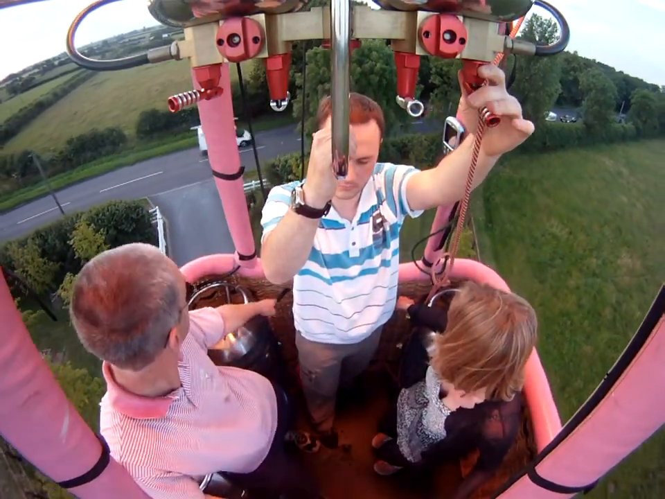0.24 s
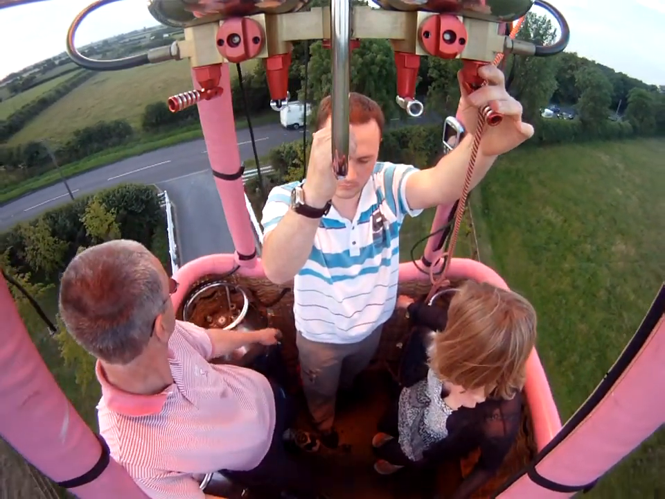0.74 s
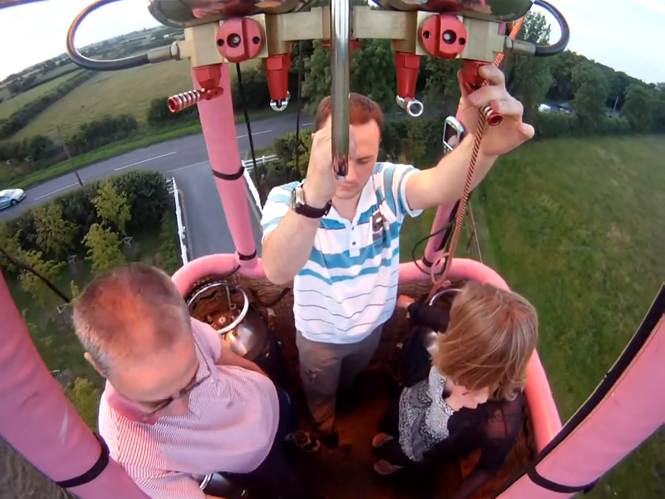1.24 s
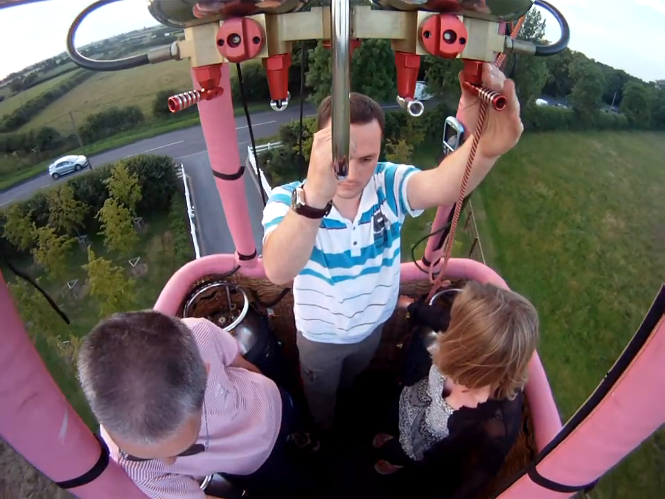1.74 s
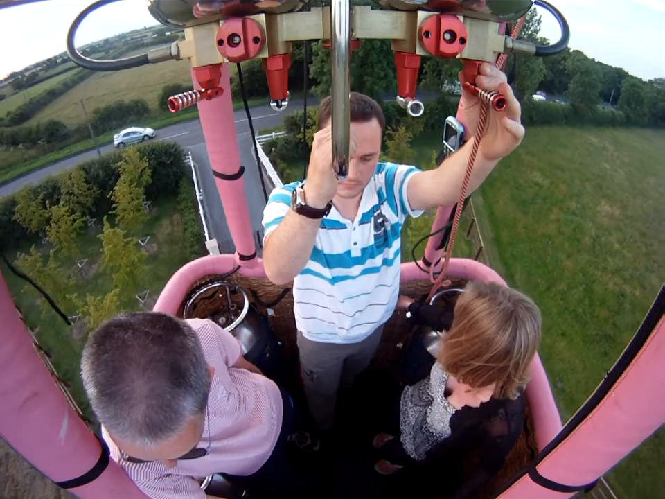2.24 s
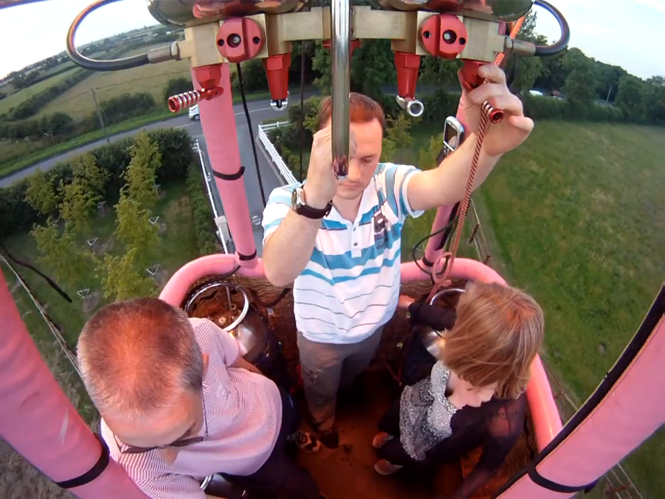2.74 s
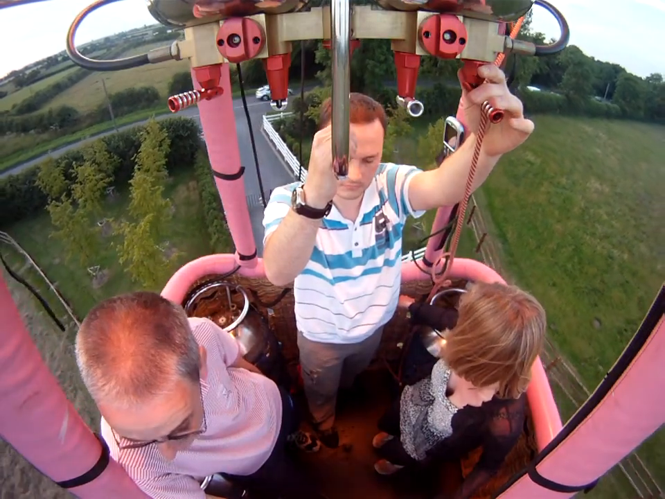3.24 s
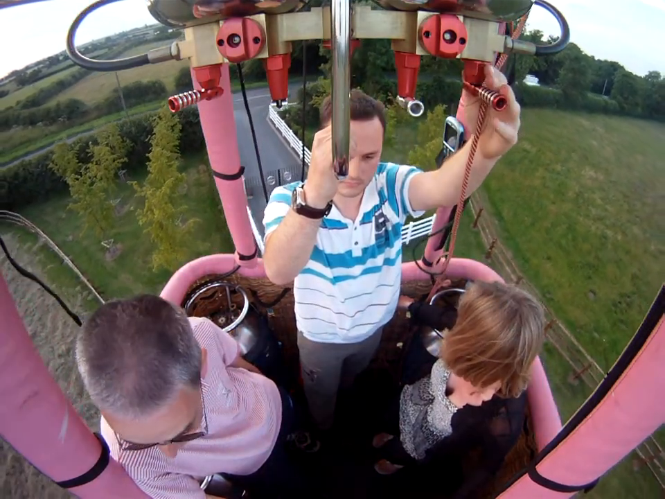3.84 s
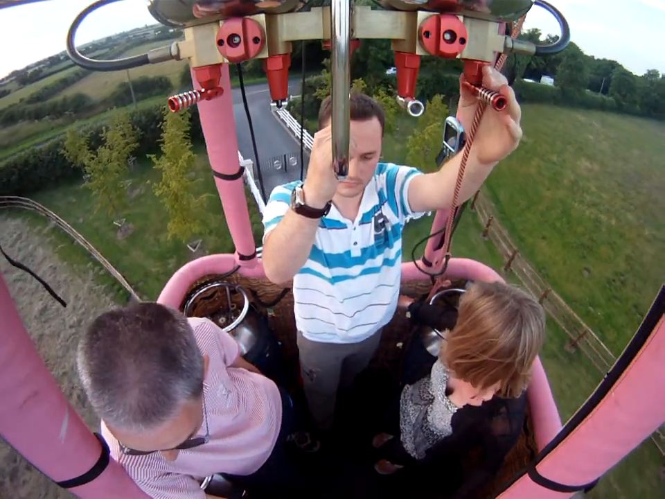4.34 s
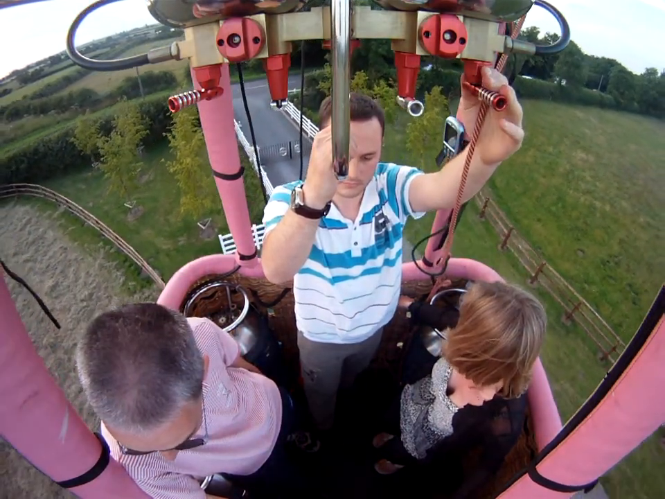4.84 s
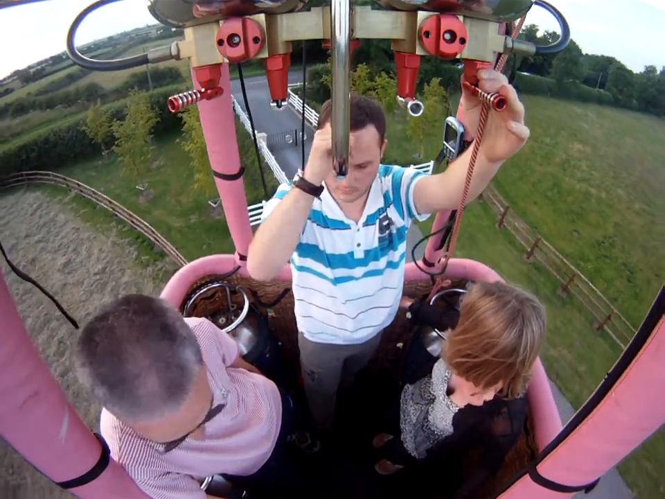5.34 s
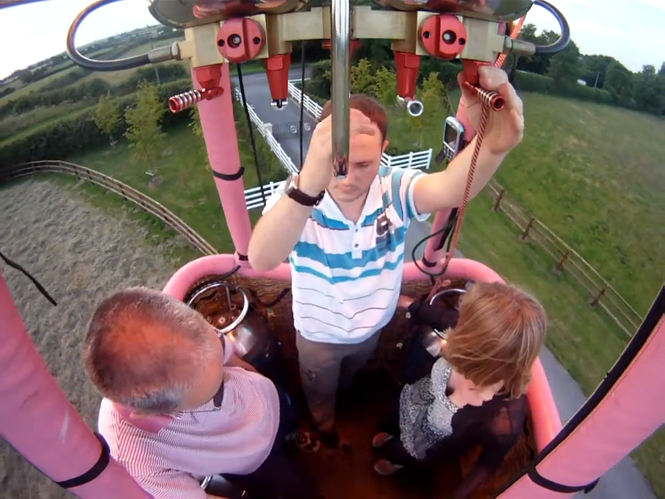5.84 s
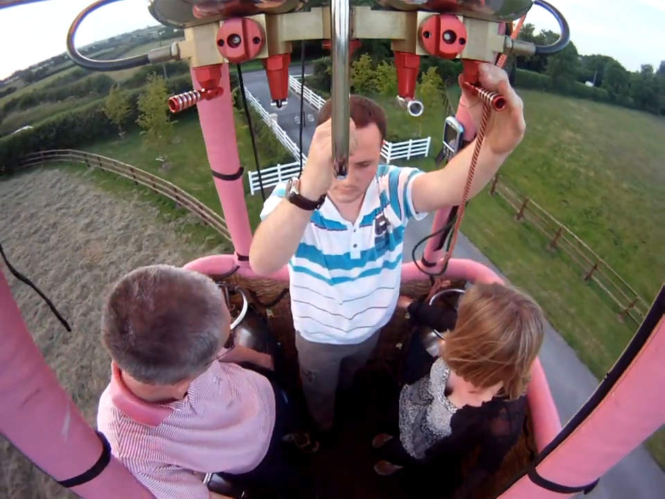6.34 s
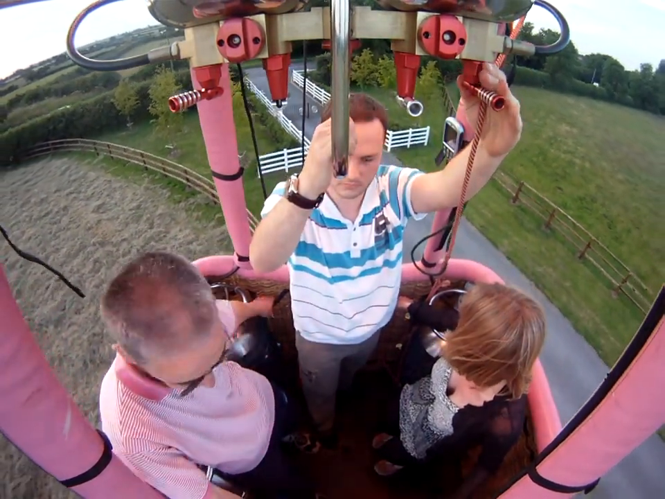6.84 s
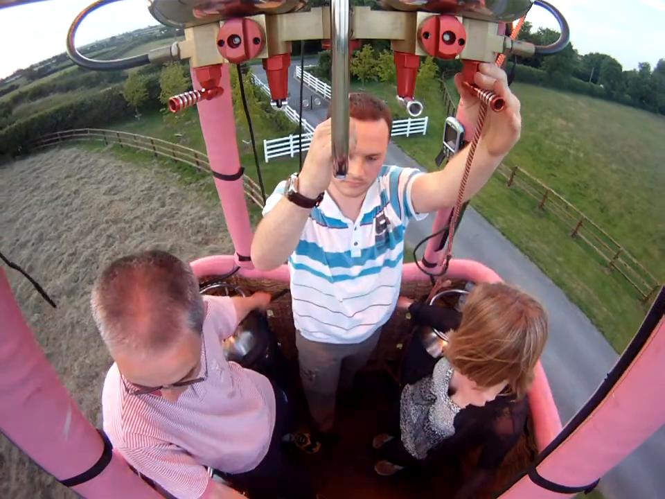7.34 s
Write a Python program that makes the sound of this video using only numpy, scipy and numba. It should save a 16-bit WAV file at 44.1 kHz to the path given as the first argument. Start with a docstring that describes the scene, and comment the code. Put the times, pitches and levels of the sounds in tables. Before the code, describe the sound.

A hot air balloon's propane burner is heard at arm's length in open air, over a steady, soft pilot flame and lightly buffeting wind. Right at the start a gas hiss opens, ignites with a deep boom and roars until about 1.7 seconds, with low pops near 1 second. A second blast runs from 2.6 to 3.6 seconds, also popping. The booms briefly push the overall level down, and after the blasts the emptying gas coil faintly whistles and spits. In the pause, the valve lever gives a faint click at 4.6 seconds, and a hollow, chattering knock on the frame comes just after 5. Five short blasts follow at about 5.7, 6.2, 6.7, 7.2 and 7.6 seconds, most with a thump, the last mainly hiss. Sharp metal lever clicks fall between them, around 6.4 and 7.4 seconds.

```python
"""A hot air balloon's propane burner, heard from the basket. The pilot flame rushes over soft buffeting air.
Two long blasts come first: each opens with a jet hiss, lights as a throbbing fireball and roars.
The booms duck the microphone's gain; after each blast the emptying gas coil whistles and spits.
In the pause the valve lever clicks, and at 5 s something knocks on the frame.
Five short blasts follow, with more lever clicks between them."""
import sys
import numpy as np
from scipy import signal
from scipy.fft import rfft, irfft, next_fast_len
from scipy.io import wavfile
from scipy.ndimage import map_coordinates
from numba import njit

SR = 44100
rng = np.random.default_rng(int(sys.argv[2]) if len(sys.argv) > 2 else 0)


def inscribe(sig):
    """Save sig as 16-bit PCM at rate SR to the path in sys.argv[1].

    A 1-D sig is mono; a 2-D sig holds one channel per row.
    Samples are clipped to [-1, 1] before scaling.
    """
    pcm = np.round(np.clip(np.atleast_2d(sig).T, -1, 1) * 32767)
    wavfile.write(sys.argv[1], SR, pcm.astype(np.int16))


N = 335160
TIME = np.arange(N) / SR


def amp(db):
    """Decibels to gain."""
    return 10 ** (np.asarray(db) / 20)


def unit(x):
    """Scale to rms 1."""
    return x / np.sqrt(np.mean(x ** 2) + 1e-20)


def humps(rows, hz):
    """Bell-shaped peaks and dips, in dB."""
    return sum(db * np.exp(-((hz - centre) / width) ** 2) for centre, width, db in rows)


def filtered(x, response):
    """Apply a gain given as a function of Hz."""
    size = next_fast_len(len(x) + 8192)
    return irfft(rfft(x, size) * response(np.fft.rfftfreq(size, 1 / SR)), size)[:len(x)]


def noise(spectrum, peaks=()):
    """Noise of rms 1, shaped by (Hz, dB) points on a log axis plus peaks."""
    knots_hz, knots_db = np.transpose(spectrum)
    slope_db = lambda hz: np.interp(np.log(hz + 1), np.log(knots_hz + 1), knots_db)
    return unit(filtered(rng.standard_normal(N), lambda hz: amp(slope_db(hz) + humps(peaks, hz))))


def wobble(knots_per_s):
    """A smooth random curve."""
    return map_coordinates(rng.standard_normal(int(N * knots_per_s / SR) + 4), [TIME * knots_per_s])


def ramp(start_s, length_s):
    """A smooth step from 0 to 1."""
    return np.sin(np.pi / 2 * np.clip((TIME - start_s) / length_s, 0, 1)) ** 2


def struck(hits, modes, attack_s, crack_db, crack_t60_s, blur_hz):
    """Each contact cracks and rings the modes at new strengths; rattling blurs their pitch."""
    out, t = np.zeros(N + SR), np.arange(SR // 2) / SR
    for start_s, db in hits:
        ring = np.zeros(len(t))
        for hz, mode_db, t60_s in modes:
            decay = amp(mode_db + rng.normal(0, 1.2) - 60 * t / t60_s)
            rattle = np.cumsum(rng.standard_normal(len(t))) * np.sqrt(2 * np.pi * blur_hz / SR)
            ring += decay * np.sin(2 * np.pi * hz * t + rattle)
        crack = amp(crack_db - 60 * t / crack_t60_s) * rng.standard_normal(len(t))
        out[round(start_s * SR):][:len(t)] += amp(db) * (ring + crack) * (1 - np.exp(-t / attack_s))
    return out[:N]


# Breeze strength. Each row: time in seconds, level in dB.
BREEZE_LEVELS = [(0, -29.5), (1.8, -45.5), (2.5, -36), (3.8, -37), (4.25, -42), (4.6, -42.5), (5.5, -44),
                 (6.5, -37.5), (7.6, -44)]
# Air spectrum. Each row: frequency in Hz, relative density in dB.
AIR_SPECTRUM = [(12, -33), (28, -6), (48, -2.5), (75, -9.5), (200, -50), (1000, -52)]


def breeze(gust_db=2.0):
    """Air buffets softly past the basket."""
    level_db = np.interp(TIME, *np.transpose(BREEZE_LEVELS))
    return amp(level_db + gust_db * wobble(6.8)) * noise(AIR_SPECTRUM)


# Pilot spectrum. Each row: frequency in Hz, relative density in dB.
PILOT_SPECTRUM = [(20, -6), (60, 2), (150, 1.5), (300, -0.5), (550, 1), (850, -6.5), (1400, -12.5),
                  (2100, -16.5), (3000, -24), (4200, -36), (6100, -61), (9400, -30.5), (11500, -33),
                  (14000, -35.5)]


def pilot_flame(level_db=-35.5, flicker_db=0.73):
    """The pilot burns throughout with a flickering rush."""
    return amp(level_db - flicker_db * wobble(37)) * noise(PILOT_SPECTRUM)


# Knocks. Each row: start in seconds, level in dB.
FRAME_HITS = [(5.056, -31), (5.074, -18.5), (5.091, -26), (5.205, -31)]
# Frame modes. Each row: frequency in Hz, relative level in dB, T60 in seconds.
FRAME_MODES = [(484, -3, 0.32), (658, -2, 0.16), (571, -4.5, 0.062), (740, -17, 0.065), (2220, -12, 0.045),
               (3900, -32, 0.069), (4950, -39, 0.058), (9900, -27, .06), (11270, -29, 0.15),
               (12600, -27, 0.15)]


def frame_knocks():
    """A hollow part of the frame is bumped and chatters."""
    return struck(FRAME_HITS, FRAME_MODES, attack_s=0.0011, crack_db=-27, crack_t60_s=0.028, blur_hz=1.2)


# Clicks. Each row: start in seconds, relative level in dB.
LEVER_HITS = [(4.5675, -33.5), (6.3685, -12.5), (6.4305, -21.5), (7.4005, -17)]
# Valve modes. Each row: frequency in Hz, relative level in dB, T60 in seconds.
LEVER_MODES = [(2230, 1, 0.044), (2630, -2, .04), (2990, -8, 0.043), (3850, -11, 0.027), (4380, -27, 0.18),
               (7700, -27, 0.12), (8969, -12, 0.035), (9744, -12.5, 0.055), (14400, -16, .06)]


def lever_clicks(gain_db=-1):
    """The steel valve lever clicks and rings briefly."""
    return amp(gain_db) * struck(LEVER_HITS, LEVER_MODES, attack_s=0.0024,
                                 crack_db=-12.5, crack_t60_s=0.017, blur_hz=70)


# Coil resonances. Each row: centre in Hz, half-width in Hz, relative level in dB.
COIL_RESONANCES = [(2390, 85, 4.5), (3000, 200, -19.5), (3820, 170, -13.5), (4980, 130, -12.5),
                   (6970, 230, -18), (9860, 89, -7), (14350, 140, -11)]


def coil_whistle(shift_hz):
    """Gas noise of rms 1 in the coil's resonances, which slide together by shift_hz."""
    def tube(hz):
        return sum(amp(db) / (1 + ((hz - centre) / width) ** 2) for centre, width, db in COIL_RESONANCES)
    whistle = signal.hilbert(filtered(rng.standard_normal(N), tube))
    return unit(np.real(whistle * np.exp(2j * np.pi * np.cumsum(shift_hz) / SR)))


# Loudest spits. Each row: time in seconds, relative level in dB.
COIL_SPITS = [(2.171, -42), (3.793, -32), (3.9, -40), (5.937, -29), (6.488, -42), (7.09, -40)]


def coil_drain(delay_s=0.089, rise_s=0.06, t60_s=3.1, bend_hz=200, bend_s=0.24, wander_hz=95.2,
               sputter_db=5, spit_db=-6, spit_rise_s=0.0186, spit_t60_s=0.21):
    """After each blast the coil sputters and spits; its whistle starts flat and rises as it empties."""
    draining, flat_hz, spits = np.zeros((3, N))
    for _, _, close_s, _, _, drain_db in BLASTS:
        closed_s = np.abs(TIME - close_s)
        onset = ramp(close_s + delay_s, rise_s)
        draining += onset * amp(drain_db - 60 * closed_s / t60_s)
        flat_hz += onset * bend_hz * np.exp(-closed_s / bend_s)
    for at_s, db in COIL_SPITS:
        decay = amp(db + spit_db - 60 * np.abs(TIME - at_s) / spit_t60_s)
        spits += ramp(at_s - spit_rise_s / 2, spit_rise_s) * decay
    flow = draining * amp(sputter_db * wobble(45)) + spits
    return flow * coil_whistle(wander_hz * wobble(22) - flat_hz)


# Loud pops. Each row: time in seconds, level in dB.
LOUD_POPS = [(0.827, 10), (.998, 9.5), (2.966, 10), (3.157, 8), (5.966, -8)]


def stray_pops(loud_hz=83.4, small_hz=220, small_per_s=11, small_db=0.5, scatter_db=5):
    """Stray gas pockets pop in the flame, the small ones at random. Returns (s, dB, Hz) pulses."""
    pulses = [(at_s, db, loud_hz) for at_s, db in LOUD_POPS]
    for open_s, opening_s, close_s, _, flame_db, _ in BLASTS:
        for _ in range(round(small_per_s * (close_s - open_s - opening_s))):
            at_s = rng.uniform(open_s + opening_s, close_s)
            pulses.append((at_s, flame_db + rng.normal(small_db, scatter_db), small_hz))
    return pulses


# Ignitions. Each row: main throb's time in seconds, level in dB, pitch in Hz, then fade in dB per throb.
FIREBALLS = [(.176, 29.5, 66.4, 35), (2.629, 17.5, 120, 1), (5.769, 16, 129, 0), (6.285, 14.5, 95, 5.5),
             (6.756, 24, 85.1, 35), (7.219, 12, 102, 8)]


def fireball_throbs(period_s=0.01817, growth_db=25.5, pitch_ratio=0.65):
    """The first gas cloud lights in five throbs, each deeper than the last. Returns (s, dB, Hz) pulses."""
    return [(at_s + k * period_s, db + min(k * growth_db, -k * fade_db), hz * pitch_ratio ** k)
            for at_s, db, hz, fade_db in FIREBALLS for k in range(-2, 3)]


def gas_thumps(pulses, puff_db=-9, puff_cycles=0.63):
    """Each gas pocket gives one pressure push between two suctions, in a puff of turbulence."""
    push, puff = np.zeros((2, N))
    for at_s, db, hz in pulses:
        near = slice(max(0, round((at_s - 4 / hz) * SR)), round((at_s + 4 / hz) * SR))
        cycles = (TIME[near] - at_s) * hz
        push[near] += amp(db) * (1 - 2 * (np.pi * cycles) ** 2) * np.exp(-(np.pi * cycles) ** 2)
        puff[near] += amp(db) * np.exp(-(cycles / puff_cycles) ** 2)
    return push + amp(puff_db) * puff * noise(RUMBLE_SPECTRUM)


# Jet spectrum. Each row: frequency in Hz, relative density in dB.
JET_SPECTRUM = [(200, 13.5), (500, 13), (1000, 0.5), (1600, -4.5), (2300, -0.5), (3000, -2), (3500, -10),
                (5000, -10.5), (5700, -14.5), (6400, -15.5), (7600, -14.5), (10000, -18.5), (13000, -18.5)]
# Resonances of the nozzles and their can. Each row: centre in Hz, half-width in Hz, gain in dB.
NOZZLE_RESONANCES = [(2230, 65, 1.5), (2730, 430, 1), (3550, 84, -4.5), (3730, 170, 3.5), (4470, 38, 2.5),
                     (4900, 220, 4), (7080, 260, 5.5), (8550, 120, 1), (9380, 530, 8), (14700, 460, 4)]


def gas_jet(blasts, closing_s, gain_db=-14, kick_db=-13, kick_s=0.045, seep_db=-33, seep_t60_s=2.4):
    """The hiss follows the valve at once: a pressure kick on opening, a seep of gas once shut."""
    flow = np.zeros(N)
    for open_s, opening_s, close_s, jet_db, _, _ in blasts:
        kick = amp(kick_db) * np.exp(-((TIME - open_s) / kick_s) ** 2)
        shut = ramp(close_s, closing_s)
        seep = amp(seep_db - 60 * np.abs(TIME - close_s - closing_s) / seep_t60_s)
        flow += amp(jet_db) * ramp(open_s, opening_s) * (1 + kick) * (1 - shut + shut * seep)
    spray_db = 1.12 * wobble(500) + 0.42 * wobble(80)  # droplets roughen the jet
    return amp(gain_db + spray_db) * flow * noise(JET_SPECTRUM, NOZZLE_RESONANCES)


# Spectra of the flame's roar and its big eddies. Each row: frequency in Hz, relative density in dB.
ROAR_SPECTRUM = [(60, -22), (140, 5), (200, 7), (250, 3.5), (380, 3), (540, 3), (680, -5), (850, -13),
                 (1200, -16), (1600, -43), (3000, -58.5)]
RUMBLE_SPECTRUM = [(12, -44), (25, -5), (60, 1), (120, 0), (190, -6.5), (280, -11.5), (500, -23.5),
                   (1500, -51)]


def main_flame(blasts, closing_s, gain_db=-8, roar_lag_s=0.057, rumble_lag_s=0.17, burnout_s=0.021,
               flare_db=2, flare_delay_s=0.064, flare_s=0.022, linger_db=-18, linger_t60_s=0.63):
    """The first gas flares, then the flame roars; its big eddies grow slowest and linger as they rise."""
    roar, rumble = np.zeros((2, N))
    for open_s, opening_s, close_s, _, flame_db, _ in blasts:
        flare = amp(flare_db) * np.exp(-((TIME - open_s - flare_delay_s) / flare_s) ** 2)
        burnt = ramp(close_s, closing_s + burnout_s)
        linger = amp(linger_db - 60 * np.abs(TIME - close_s - closing_s) / linger_t60_s)
        roar += amp(flame_db) * ramp(open_s, opening_s + roar_lag_s) * (1 - burnt) * (1 + flare)
        rumble += amp(flame_db) * ramp(open_s, opening_s + rumble_lag_s) * (1 - burnt + burnt * linger)
    turbulence_db = 2.0 * wobble(50) + 1.5 * wobble(14)  # fast flapping, slower surges
    return amp(gain_db + turbulence_db) * (roar * noise(ROAR_SPECTRUM) + rumble * noise(RUMBLE_SPECTRUM))


# Blasts. Each row: valve's opening start, opening duration and closing start in seconds,
# then relative levels of jet, flame and coil drain in dB.
BLASTS = [(0.085, 0.057, 1.641, 5, 1.04, -45.5), (2.573, 0.064, 3.598, 6.5, 3.5, -53),
          (5.717, 0.054, 5.854, 3.5, 2.5, -55), (6.18, 0.022, 6.28, -0.5, -7, -46.5),
          (6.686, 0.026, 6.795, 0.5, 0, -62), (7.148, 0.034, 7.27, 2.5, 0, -45.5),
          (7.554, 0.018, 7.62, -1, -14, -50)]


def burner(closing_s=0.056):
    """The valve feeds jet and flame, and always springs shut at the same speed."""
    return gas_jet(BLASTS, closing_s) + main_flame(BLASTS, closing_s)


def scene():
    """Everything sounds within arm's reach, in open air."""
    fire = burner() + gas_thumps(fireball_throbs() + stray_pops())
    return (fire + coil_drain() + frame_knocks() + lever_clicks() + pilot_flame() + breeze())[None]


@njit
def follow(x, rise, fall):
    """Level detector with separate rise and fall rates per sample."""
    out, level = np.empty_like(x), 0.0
    for i in range(len(x)):
        level += (x[i] - level) * (rise if x[i] > level else fall)
        out[i] = level
    return out


# Microphone port colour. Each row: centre in Hz, half-width in Hz, gain in dB.
MIC_PORT = [(6010, 700, -8), (11490, 260, 9), (11950, 150, -12), (12250, 300, 9)]


def record(dry, ceiling_db=-13, attack_s=0.011, release_s=0.064, ahead_s=0.0012,
           low_cut_hz=27, top_hz=15400):
    """Port colour, gain control that ducks under loud sound, soft clipping, band limits."""
    x = filtered(dry[0], lambda hz: amp(humps(MIC_PORT, hz)))
    level = follow(np.abs(x), 1 / (attack_s * SR), 1 / (release_s * SR))
    level = np.interp(TIME + ahead_s, TIME, level)
    x = x / np.maximum(1, level / amp(ceiling_db))
    x = filtered(x, lambda hz: hz ** 2 / np.hypot(hz ** 2, low_cut_hz ** 2))
    x = x / (1 + np.abs(x) ** 6) ** (1 / 6)  # soft clip at full scale
    return filtered(x, lambda hz: 1 / (1 + (hz / top_hz) ** 150))[None]


dry = scene()
out = record(dry)
inscribe(out)
```